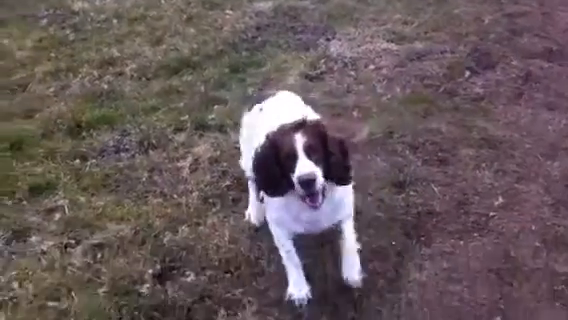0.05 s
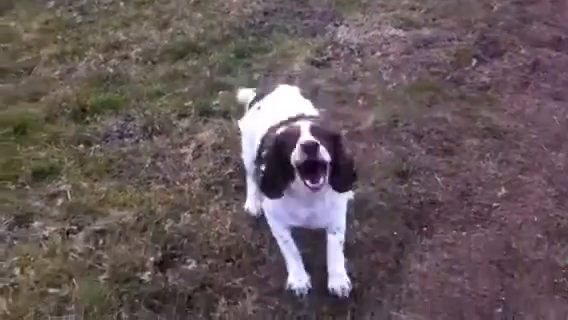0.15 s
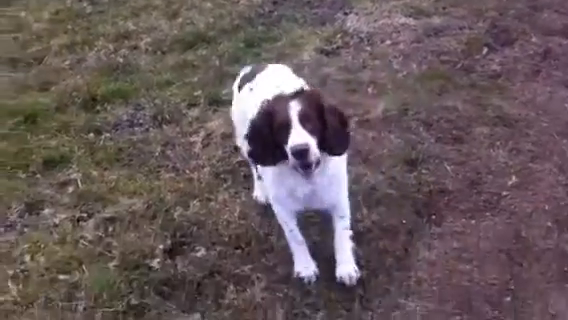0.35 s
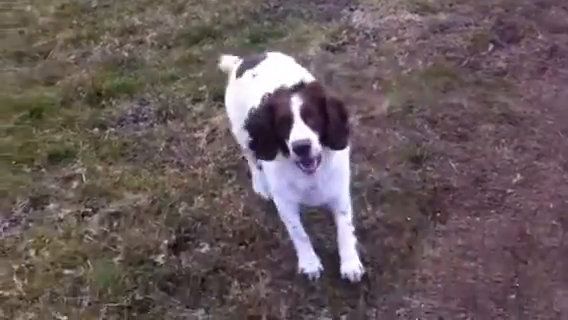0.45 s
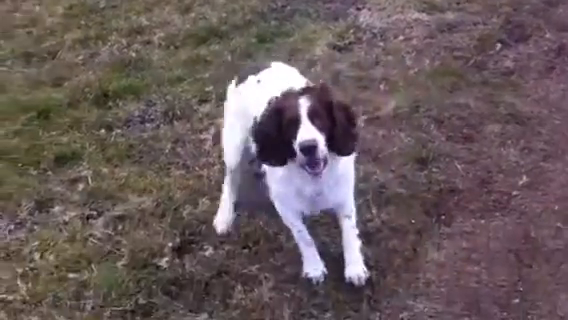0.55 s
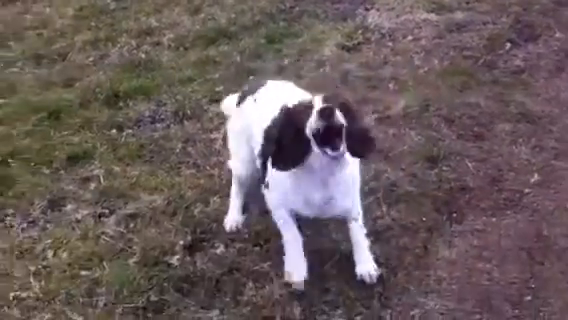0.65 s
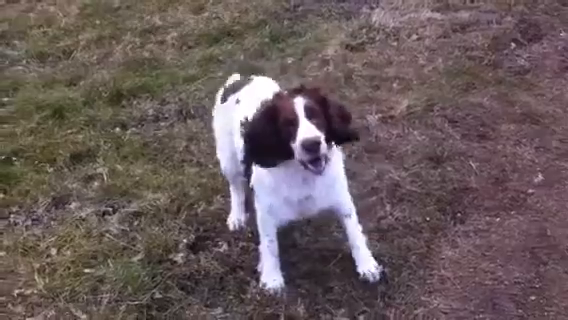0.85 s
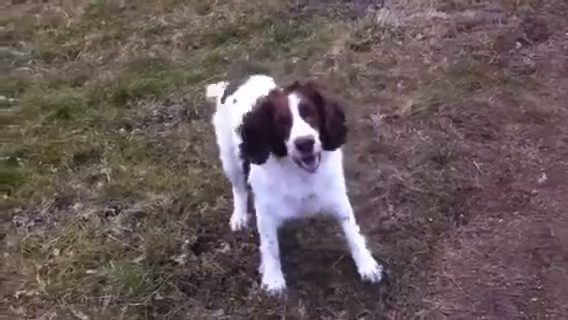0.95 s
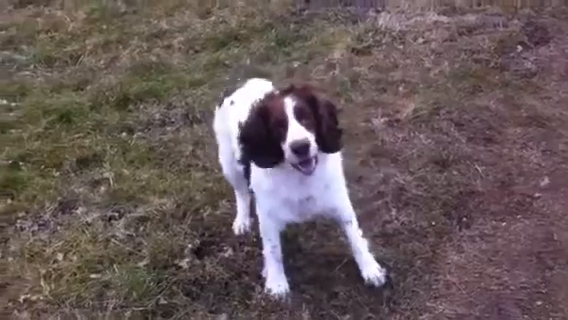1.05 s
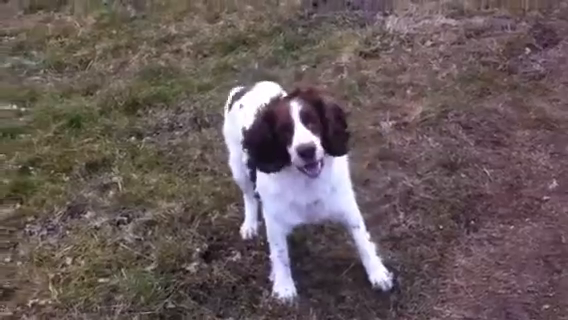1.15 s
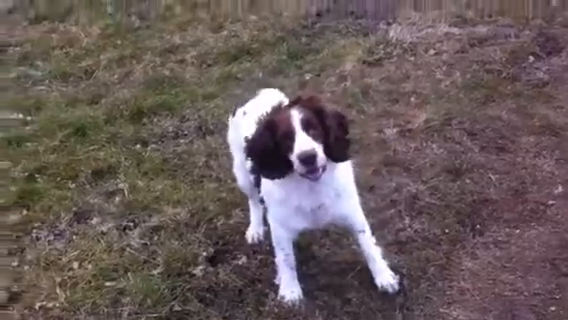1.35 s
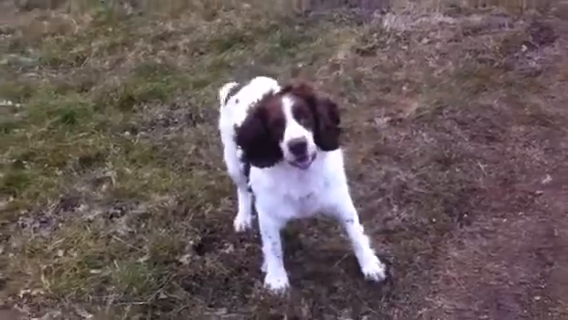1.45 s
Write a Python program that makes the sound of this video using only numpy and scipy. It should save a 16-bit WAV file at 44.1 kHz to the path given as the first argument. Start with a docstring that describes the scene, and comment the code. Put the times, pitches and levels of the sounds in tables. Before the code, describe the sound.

Two close dog barks on an open grassy slope. Low handling rumble and a hard knock at 0.12 s, with faint drawn breath, lead to the first bark at 0.21-0.37 s: rising quickly, hoarse, then dropping. Soft bumps and another gasp precede a rougher bark at 0.72-0.87 s. Faint outdoor reflections follow, with a thin nose breath near 1.07 s and tiny falling bird whistles from 1.07 to 1.37 s.

```python
"""A dog barks twice, close by, on an open grassy slope, over steady air noise, low rumble and bumps.
It draws air (swelling filtered noise) before each bark; a hard knock falls just before the first.
Each bark (fold pulses ringing a changing mouth) scoops up, splits into a hoarse growl, drops and clears
as the jaws close; the ground, slope and far hillside return it faintly as decaying noise reflections.
A thin breath of noise swells from the second bark on, then gliding sine whistles of a far bird follow."""
import sys
import numpy as np
from scipy import signal
from scipy.fft import rfft, irfft, next_fast_len
from scipy.io import wavfile
from scipy.ndimage import uniform_filter1d, map_coordinates

SR = 44100
rng = np.random.default_rng(int(sys.argv[2]) if len(sys.argv) > 2 else 0)


def store_pcm(level_fs):
    """Save levels as 16-bit WAV."""
    pcm = np.round(np.clip(level_fs, -1, 1) * 32767).astype(np.int16)
    wavfile.write(sys.argv[1], SR, np.atleast_2d(pcm).T)


N = 66150
T = np.arange(N) / SR


def undb(db):
    """Level to amplitude: 20 dB is a factor of ten."""
    return 10 ** (np.asarray(db) / 20)


def unit(x):
    """Normalisation to an rms of 1."""
    return x / np.sqrt(np.mean(x ** 2))


def curve(rows, axis=1):
    """Linear interpolation in time of one column of a table."""
    rows = np.array(rows)
    return np.interp(T, rows[:, 0], rows[:, axis])


def colour(x, points):
    """Minimum-phase filtering: the folded cepstrum gives a causal response through (f/Hz, level/dB)."""
    size = next_fast_len(2 * N)
    hz, db = np.array(points).T
    log_bins = np.log(np.fft.rfftfreq(size, 1 / SR) + 1)
    gain = undb(np.interp(log_bins, np.log(hz), db))
    cepstrum = irfft(np.log(gain), size)
    cepstrum[1:size // 2] *= 2
    cepstrum[size // 2 + 1:] = 0
    response = np.exp(rfft(cepstrum))
    return irfft(rfft(x, size) * response, size)[:N]


def noise(points):
    """Spectral shaping of white noise, at an rms of 1."""
    return unit(colour(rng.standard_normal(N), points))


def wander(hz):
    """Random modulation: chance values, hz of them a second, joined by a cubic spline, rms 1."""
    return unit(map_coordinates(rng.standard_normal(N), [T * hz], order=3, mode="wrap"))


def even_out(x, size=400):
    """Envelope normalisation: division by the short-term rms, smoothed over size samples twice."""
    power = uniform_filter1d(uniform_filter1d(x ** 2, size), size)
    return x / np.sqrt(np.abs(power) + 1e-12)


def scatter(x, t60):
    """Diffuse reflection: convolution with noise that decays by 60 dB in t60 seconds."""
    tail = rng.standard_normal(N) * np.exp(-np.log(1000) * T / t60)
    return signal.fftconvolve(x, tail / np.sqrt(np.sum(tail ** 2)))[:N]


# spectrum of the background air: f/Hz, level/dB
AIR_SPECTRUM = [(290, -36.5), (500, 1), (1720, -14), (5460, -21.5), (6030, -15.5), (6670, -23.5),
                (15000, -24)]
AIR_DB = -69.5


def air():
    """Stationary noise: a steady, broadband background."""
    return undb(AIR_DB) * noise(AIR_SPECTRUM)


# spectrum of the low rumble: f/Hz, level/dB
RUMBLE_SPECTRUM = [(50, -20), (90, -6), (130, 2), (195, -1), (280, -8), (400, -19.5), (1500, -57)]
# strength of the rumble: t/s, level/dB
RUMBLE_STRENGTH = [(0, -35.5), (.15, -34.5), (.2, -46), (.3, -48.5), (.6, -42.5), (.74, -42), (.85, -53),
                   (1.1, -50.5), (1.5, -51)]
# low bumps on the microphone: centre t/s, level/dB
BUMP_TIMES = [(0.054, -29.5), (0.12, -17.5), (0.225, -27), (0.339, -31), (0.482, -30.5), (0.556, -31.5),
              (0.724, -29), (1.101, -36.5), (1.227, -38.5), (1.435, -35.5)]
BUMP_HZ, BUMP_WIDTH_S = 188, 0.006
KNOCK_S, KNOCK_DB, KNOCK_HZ, KNOCK_DECAY_S = .115, -8.5, 272, 0.0016
KNOCK_BAND_HZ = [140, 1670]


def ring(start, hz, decay):
    """Damped free oscillation: a sine whose amplitude falls by a factor e in decay seconds."""
    age = np.maximum(T - start, 0)
    return np.sin(2 * np.pi * hz * age) * np.exp(-age / decay)


def handling():
    """Structure-borne sound of a hand-held microphone: rumble, Gaussian bumps and a damped knock."""
    bumps = 0
    for centre, db in BUMP_TIMES:
        age = T - centre
        bumps = bumps + undb(db) * np.cos(2 * np.pi * BUMP_HZ * age) * np.exp(-(age / BUMP_WIDTH_S) ** 2)
    band = signal.butter(2, KNOCK_BAND_HZ, "band", fs=SR, output="sos")
    knock = -undb(KNOCK_DB) * signal.sosfilt(band, ring(KNOCK_S, KNOCK_HZ, KNOCK_DECAY_S))
    rumble = even_out(noise(RUMBLE_SPECTRUM), size=2000) * undb(curve(RUMBLE_STRENGTH))
    return bumps + knock + rumble


# far bird notes: start t/s, length t/s, start f/Hz, end f/Hz, peak level/dB
BIRD_NOTES = [(1.07, .11, 6270, 6170, -73), (1.26, .11, 6450, 5780, -71), (1.23, .06, 4000, 3990, -76)]


def birds():
    """Frequency modulation: thin sine whistles glide downward with a slight random waver."""
    out = 0
    for start, length, from_hz, to_hz, db in BIRD_NOTES:
        progress = np.clip((T - start) / length, 0, 1)
        hz = (from_hz + (to_hz - from_hz) * progress) * (1 + 0.00583 * wander(200))
        whistle = np.sin(2 * np.pi * np.cumsum(hz) / SR)
        out = out + undb(db) * np.sin(np.pi * progress) * whistle
    return out


# spectrum returned by the hillside: f/Hz, level/dB
SLOPE_SPECTRUM = [(300, -11.5), (680, 6), (1100, -2.5), (1750, -5), (8000, -15.5)]
# spectrum returned by the grass nearby: f/Hz, level/dB
GROUND_SPECTRUM = [(400, -14), (1000, -4), (2000, -6), (2900, 14), (15000, -2)]
GROUND_DB, GROUND_T60_S = -21.5, 0.18
SLOPE_DB, SLOPE_T60_S = -41, 0.48
ECHO_S, ECHO_DB, ECHO_T60_S = .16, -48, .22  # far hillside: delay, level, decay


def reflections(dog):
    """Diffuse reflection: ground and slope answer at once, the far hillside after a delay."""
    far = colour(dog, SLOPE_SPECTRUM)
    delayed = np.interp(T - ECHO_S, T, far)
    echo = undb(ECHO_DB) * scatter(delayed, ECHO_T60_S)
    slope = undb(SLOPE_DB) * scatter(far, SLOPE_T60_S)
    ground = undb(GROUND_DB) * scatter(colour(dog, GROUND_SPECTRUM), GROUND_T60_S)
    return echo + slope + ground


# air drawn before each bark: start t/s, peak t/s, end t/s, peak level/dB
GASPS = [(0, 0.191, 0.197, -51), (0.562, 0.682, 0.718, -48.5)]
# spectrum of the drawn air: f/Hz, level/dB
GASP_SPECTRUM = [(600, 1.5), (1100, 1), (1450, -6.5), (1850, 1.5), (2900, -6), (3500, -17), (14000, -29.5)]
# spectrum of the thin breath through the nose: f/Hz, level/dB
SNIFF_SPECTRUM = [(1300, -23.5), (1660, -5), (2200, -21), (3350, -5.5), (3850, -20), (4330, -13),
                  (5200, -26)]
# course of the thin breath: start, peak and end t/s
SNIFF_TIMES = (.75, 1.07, 1.15)
SNIFF_DB = -63


def intakes():
    """Turbulent flow noise: swelling gasps through the mouth and a thinner breath through the nose."""
    swell = 0
    for start, peak, end, db in GASPS:
        swell = swell + undb(db) * np.interp(T, [start, peak, end], [0, 1, 0]) ** 2
    gasps = noise(GASP_SPECTRUM) * swell
    sniff = noise(SNIFF_SPECTRUM) * undb(SNIFF_DB) * np.interp(T, SNIFF_TIMES, [0, 1, 0])
    return gasps + sniff


# vocal folds, one table per bark: t/s, pitch f/Hz, roughness (0 = clear), even-harmonic level/dB
FOLD_MOTION = [
    [(.212, 341.6, .35, -2), (.223, 493, 0.24, -3), (.233, 650.2, 0.2, -11.5), (.241, 807, 0.65, 6),
     (.247, 936, 0.17, -9.5), (.27, 915.2, 0.22, -2.5), (.28, 974, 0.59, 4.5), (.301, 1072, 0.57, -10),
     (.306, 642, 0, -9), (.333, 583.4, 0.08, -13.5), (.345, 497.5, 0, -1.5), (.362, 438, 0.06, -12)],
    [(.722, 320.8, 0.2, 16.5), (.731, 430.3, 0.23, -7.5), (.742, 653.5, 0.32, -5.5),
     (.756, 916.7, 0.38, -1.5), (.768, 958.2, .85, -5.5), (.792, 790.8, 0.82, -3.5), (.811, 915, 1.16, 0),
     (.817, 632.6, 0.26, 9), (.832, 601.4, 0.2, 4), (.85, 517, 0, -8.5), (.866, 410, 0.02, -5.5)],
]
# effort, one table per bark: t/s, voice level/dB (before VOICE_DB), hiss level/dB
BARK_EFFORT = [
    [(0.208, -50, -70), (0.218, -21.5, -52.5), (0.23, -11, -45.5), (0.248, -8, -35.5), (0.272, -9, -34),
     (0.312, -10, -38.5), (0.33, -10.5, -49), (0.352, -19.5, -57), (0.368, -45.5, -61.5)],
    [(0.718, -48.5, -59), (0.726, -20, -53), (0.738, -11, -43), (0.76, -8, -35.5), (0.822, -17.5, -40.5),
     (0.84, -12.5, -43), (0.856, -21, -54.5), (0.872, -35, -61)],
]
# throat and mouth with the jaws wide: f/Hz (before the tuning factor), level/dB
WIDE_MOUTH = [(280, -36), (400, -6.5), (640, -2.5), (930, 0.5), (1130, 2), (1380, -8.5), (1530, -20.5),
              (1830, -8.5), (2080, -11.5), (2750, -20), (3100, -45), (4400, -56.5)]
# throat and mouth with the jaws closing: f/Hz, level/dB
CLOSING_MOUTH = [(300, -29.5), (460, -5.5), (620, -5.5), (900, -8.5), (1050, -10), (1240, -12.5),
                 (1480, -29), (1690, -10.5), (1870, -5.5), (2100, -28.5), (2500, -12.5), (3000, -38.5),
                 (4400, -60.5)]
# spectrum of the breath hiss in a bark: f/Hz, level/dB
HISS_SPECTRUM = [(2300, -32.5), (3100, -9), (3900, 3.5), (4250, -6), (4430, -24), (4750, -0.5),
                 (5250, -2.5), (5520, -7), (6000, 4), (7000, -2), (8400, 0.5), (12500, -10), (15500, -15)]
# middle of the jaw closing, per bark: t/s
CLOSING_TIMES = [.302, .814]
# factor on the open mouth's resonance frequencies, per bark
OPEN_TUNING = [1.01, 1]
VOICE_DB, RASP_DB = -2.5, -3
OPEN_S, CLOSE_S = 0.048, 0.011  # length of the jaw movements
ATTACK_S, RELEASE_S = 0.0023, 0.0039
SOFT_BELOW_DB, SOFT_SLOPE = -7.5, 0.39  # dB lost per harmonic for each dB of effort below the first
SPLIT_HZ, SPLIT_DEPTH = (650, 870), .8  # the octave-below growl grows through this range of pitch
TRIPLING, SWAY_RAD = 0.81, 1  # every third cycle repeats, in strength and in timing, times roughness
JITTER, SHIMMER_DB, FLUTTER_HZ = .075, 2.5, 327.66  # irregular pitch and strength, times roughness
SHUDDER_DB, SHUDDER_HZ = 6.5, 120  # throb in strength, depth times roughness
BREATH, HISS_PULSING = .13, .45  # least breath in the source, depth of its puffs
HISS_GRAIN_DB, HISS_GRAIN_HZ = 2, 110


def bark(folds, effort, closes, tuning):
    """Source-filter principle: fold pulses, split or uneven, and puffs of air ring a changing mouth."""
    pitch, rough, even_db = curve(folds), curve(folds, axis=2), curve(folds, axis=3)
    voice_db, hiss_db = curve(effort), curve(effort, axis=2)
    start, end = folds[0][0], folds[-1][0]

    # subharmonics: a half-rate growl at high pitch, a third-rate one in hoarse voice
    hz = pitch * np.exp(JITTER * rough * wander(FLUTTER_HZ))
    phase = 2 * np.pi * np.cumsum(hz) / SR
    double = np.interp(pitch, SPLIT_HZ, [0, SPLIT_DEPTH]) * np.cos(phase / 2)
    triple = rough * np.cos(phase / 3 + rng.uniform(0, 2 * np.pi))
    phase = phase + SWAY_RAD * triple

    closed = np.clip((T - closes) / CLOSE_S + .5, 0, 1)
    wide = np.clip((T - start) / OPEN_S + .5, 0, 1) * (1 - closed)

    # six harmonics; the upper ones fade as the closed voice weakens
    dull_db = closed * SOFT_SLOPE * np.minimum(voice_db - SOFT_BELOW_DB, 0)
    pulses = 0
    for k in range(6):
        harmonic_db = k * dull_db + k % 2 * even_db  # odd k is an even harmonic
        pulses = pulses + np.cos((k + 1) * phase) * undb(harmonic_db)
    shimmer = undb(SHIMMER_DB * rough * wander(2 * FLUTTER_HZ))
    pulses = pulses * np.sqrt(4 * hz / SR) * (1 + double + TRIPLING * triple) * shimmer

    puffs = 1 + HISS_PULSING * np.cos(phase)
    rasp = undb(RASP_DB) * np.hypot(rough, BREATH) * puffs * rng.standard_normal(N)
    source = pulses + rasp
    open_voice = colour(source, np.array(WIDE_MOUTH) * [tuning, 1])
    closing_voice = colour(source, CLOSING_MOUTH)
    voice = even_out(wide * open_voice + (1 - wide) * closing_voice) * undb(voice_db + VOICE_DB)

    hiss = even_out(colour(puffs * rng.standard_normal(N), HISS_SPECTRUM))
    hiss = hiss * undb(HISS_GRAIN_DB * wander(HISS_GRAIN_HZ)) * undb(hiss_db)

    attack = np.clip((T - start) / ATTACK_S + 1, 0, 1)
    release = np.exp(-np.maximum(T - end, 0) / RELEASE_S)
    shudder_hz = SHUDDER_HZ * (1 + .25 * wander(SHUDDER_HZ))
    throb = np.cos(2 * np.pi * np.cumsum(shudder_hz) / SR)
    return attack * release * undb(SHUDDER_DB * rough * throb) * (voice + hiss)


def scene():
    """Superposition: the background, the dog's breath and barks, and their reflections add linearly."""
    barks = zip(FOLD_MOTION, BARK_EFFORT, CLOSING_TIMES, OPEN_TUNING)
    dog = sum(bark(*parts) for parts in barks)
    return (air() + handling() + birds() + reflections(dog) + intakes() + dog)[None]


CEILING = .8  # amplitude that the rounded peaks approach
LOW_CUT_HZ, TOP_HZ = 80, 15750


def record(dry):
    """Saturation and band limiting: the recorder rounds loud peaks, thins deep bass and cuts the top."""
    held = dry / (1 + (dry / CEILING) ** 8) ** (1 / 8)
    low_cut = signal.butter(2, LOW_CUT_HZ, "high", fs=SR, output="sos")
    top_cut = signal.ellip(10, .2, 80, TOP_HZ, fs=SR, output="sos")
    return signal.sosfilt(top_cut, signal.sosfilt(low_cut, held))


dry = scene()
out = record(dry)
store_pcm(out)
```